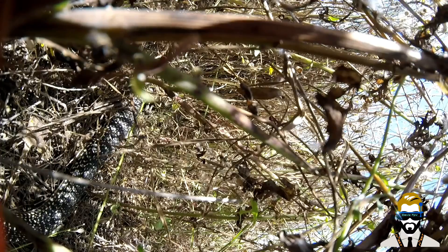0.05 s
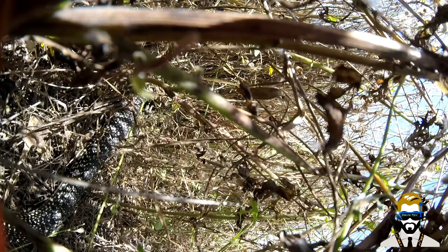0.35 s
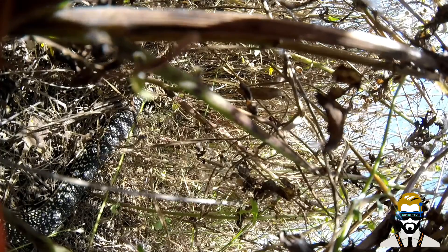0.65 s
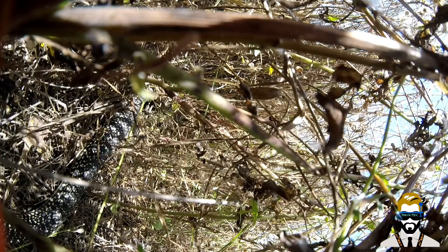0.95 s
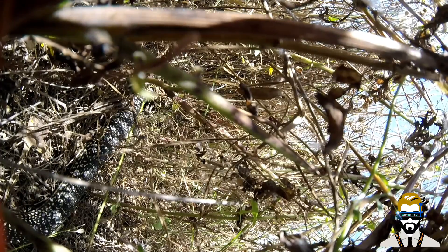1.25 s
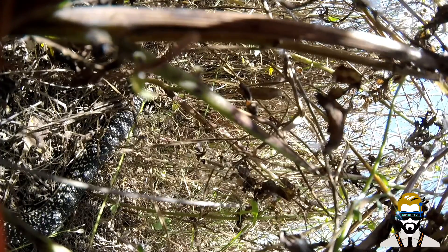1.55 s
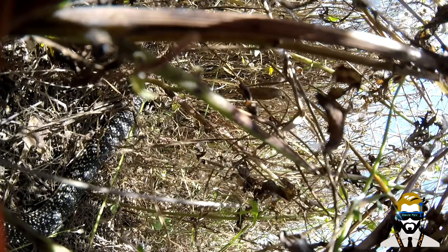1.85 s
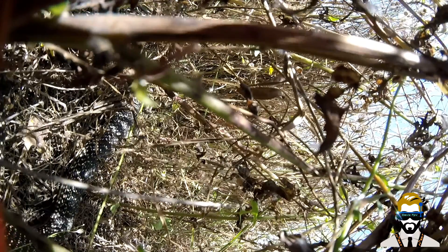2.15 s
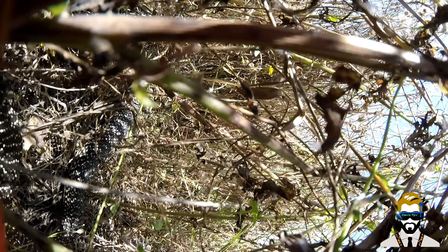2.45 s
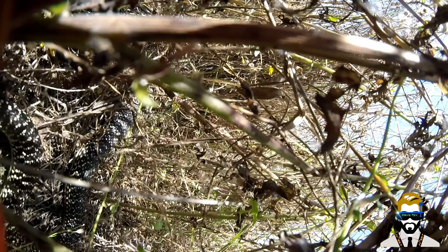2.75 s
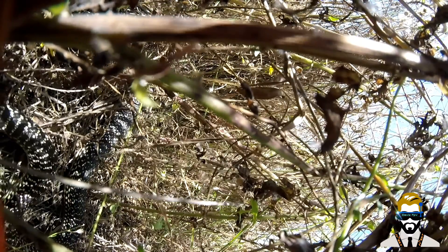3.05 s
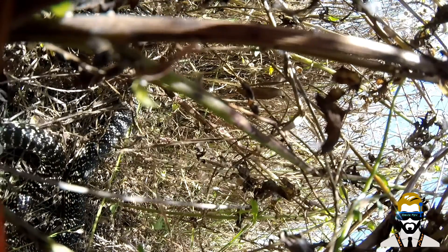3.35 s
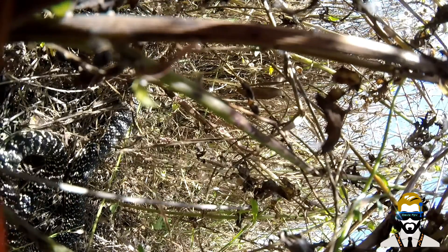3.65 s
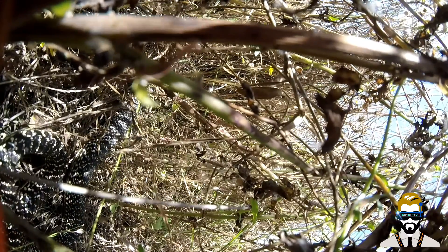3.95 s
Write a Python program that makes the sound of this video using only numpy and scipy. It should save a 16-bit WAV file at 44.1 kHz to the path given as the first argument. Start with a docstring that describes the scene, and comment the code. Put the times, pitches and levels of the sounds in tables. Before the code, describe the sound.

Faint rustling of a snake moving through dry undergrowth outdoors, heard close at ground level. After sparse clicks, stems bump the microphone and a low scraping sets in with brittle crackles and snaps. Steady hiss and rumble lie underneath.

```python
"""An animal, probably a snake, slides through dry grass, its body dragging dully over the ground.
Friction excites a low rustle and the shifting weight a boom. Blades crackle in tiny impulses,
brittle stalks snap by fracture or squeak by stick-slip, and a few stems knock a camera lying
on the ground, exciting its damped modes. Under it all lie a low outdoor rumble and microphone hiss."""
import sys
import numpy as np
from scipy import signal
from scipy.fft import next_fast_len
from scipy.io import wavfile

SR = 44100
rng = np.random.default_rng(int(sys.argv[2]) if len(sys.argv) > 2 else 0)


def to_wav(s):
    """Save 16-bit WAV."""
    ch = np.atleast_2d(s).T  # columns
    pcm = np.round(np.clip(ch, -1, 1) * 32767)  # PCM
    wavfile.write(sys.argv[1], SR, pcm.astype(np.int16))


N = 176400
TIME = np.arange(N) / SR


# Friction of the body on the ground (time [s], level [dB])
DRAG_LEVEL = [(0, -81), (.26, -69), (.295, -51), (.35, -56), (.44, -52.5), (.54, -56.5), (.65, -61),
              (1.4, -65), (2.1, -61.5), (2.2, -45.5), (2.3, -51.5), (2.44, -59), (2.53, -54), (2.57, -51),
              (2.66, -48), (2.86, -53.5), (3.13, -54.5), (3.4, -49.5), (3.52, -54.5), (3.75, -61.5),
              (4, -56)]
# Slips heard through the ground (frequency [Hz], relative spectral density [dB])
DRAG_SPECTRUM = [(30, -11.5), (70, -11), (105, -1.5), (160, -6.5), (210, -6.5), (290, -9), (420, -13),
                 (600, -26), (900, -34.5), (2200, -37.5), (4000, -71.5)]

def drag():
    """Sliding friction: many small slips of the body merge into a noise that the ground dulls."""
    slips = clicks(per_s=900, spread_db=1)
    return level(DRAG_LEVEL) * unit(colour(slips, DRAG_SPECTRUM))


# Boom under the moving body (time [s], level [dB])
BOOM_LEVEL = [(0, -59.5), (2.12, -72), (2.22, -46.5), (2.42, -59.5), (2.52, -50.5), (2.7, -50),
              (2.9, -47.5), (3.1, -54), (3.38, -45.5), (3.55, -58), (4, -61.5)]

def boom():
    """Forced vibration: shifting weight drives a broad, low resonance of ground and camera mount."""
    force = rng.standard_normal(N)
    return level(BOOM_LEVEL) * unit(resonate(force, hz=101.5, width_hz=82))


# Crackling of the blades (time [s], level [dB])
CRACKLE_LEVEL = [(0, -103), (.4, -67.5), (.6, -78), (.88, -71), (2.08, -75.5), (2.19, -58.5), (2.4, -71),
                 (2.55, -63), (2.64, -60), (2.77, -58.5), (2.87, -65.5), (3.05, -63), (3.2, -66.5),
                 (3.34, -59.5), (3.45, -63), (3.66, -67), (3.78, -71), (4, -67)]
# Timbre of dry blades (frequency [Hz], relative spectral density [dB])
CRACKLE_SPECTRUM = [(300, -28), (900, -1.5), (2000, -2.5), (3300, -2.5), (4400, 0.5), (4800, 4.5),
                    (5400, 7), (5950, -5.5), (6500, 8), (7300, -5.5), (9000, -4.5), (11000, -31),
                    (15000, -36)]

def crackle(blades=12, total_per_s=900, decay_s=0.0012):
    """Shot noise: dry blades flick past each other at random, each with its own tiny burst."""
    t = TIME[:512]
    bursts = rng.standard_normal((blades, len(t))) * np.exp(-t / decay_s)
    grains = np.zeros(N)
    for burst in bursts:
        flicks = clicks(total_per_s / blades, spread_db=2.8)
        grains += signal.oaconvolve(flicks, unit(burst))[:N]
    return level(CRACKLE_LEVEL) * unit(colour(grains, CRACKLE_SPECTRUM))


# Breaking stalks, plus a sharp click at 0.862 s as a stem strikes the camera (time [s], ring gain [dB], ring
# frequency [Hz], decay time [s], crack gain [dB])
SNAPS = [(0.5097, -55, 5200, 0.0006, -65), (.862, -57, 5200, .0007, -66), (1.433, -56, 5200, 0.00058, -57),
         (1.7004, -51.5, 5560, 0.0013, -56.5), (2.107, -51.5, 5000, 0.0009, -61),
         (2.1683, -62, 5100, 0.0023, -54), (2.181, -74, 5800, 0.0022, -52.5), (2.274, -57, 4900, .001, -61),
         (2.2895, -55.5, 5500, 0.0026, -56), (2.612, -61, 5240, 0.0022, -58),
         (2.673, -58, 5000, 0.0014, -66), (2.7139, -56, 5400, 0.0011, -52), (2.737, -59, 5130, 0.0018, -57),
         (2.766, -49, 4800, 0.0017, -61), (2.767, -39.5, 5070, .0015, -43.5),
         (2.7728, -51, 5350, .0015, -58), (2.807, -56, 5360, .0015, -56), (3.019, -58, 5200, 0.00087, -63),
         (3.0805, -50.5, 4900, 0.0027, -55), (3.319, -47.5, 5660, 0.001, -72),
         (3.3698, -40.5, 6140, 0.00088, -57), (3.515, -54.5, 4850, .001, -61),
         (3.712, -56, 4600, 0.0014, -52), (3.81, -60, 5300, .001, -60), (3.857, -41.5, 5300, 0.00068, -52),
         (3.9185, -59, 4640, 0.00088, -65)]
# Crack of the fibres (frequency [Hz], relative spectral density [dB])
CRACK_SPECTRUM = [(200, 6), (900, 6), (2000, 8.5), (3500, 7.5), (5500, -0.5), (7000, 9.5), (9000, -1.5),
                  (11000, -16), (15000, -23)]

def snap(ring_db, ring_hz, decay_s, crack_db, scatter_db=-38, scatter_s=0.021):
    """Brittle fracture: a broad crack and the stalk's short ring, scattered faintly by the grass."""
    t = TIME[:2048]
    fade = np.exp(-t / decay_s) + amp(scatter_db) * np.exp(-t / scatter_s)
    ring_burst, crack_burst = rng.standard_normal((2, len(t))) * fade
    ring = unit(resonate(ring_burst, ring_hz, width_hz=1500))
    crack = unit(colour(crack_burst, CRACK_SPECTRUM))
    return 2 * rms(fade) * (amp(ring_db) * ring + amp(crack_db) * crack)


# Rubbing blades (time [s], duration [s], start frequency [Hz], end frequency [Hz], level [dB])
SQUEAKS = [(3.568, 0.024, 5200, 5600, -63), (3.648, 0.026, 4250, 4600, -63.5)]

def squeak(length_s, start_hz, end_hz, db):
    """Stick-slip friction: a rubbing blade gives a brief rising chirp of narrow-band noise."""
    progress = np.linspace(0, 1, round(length_s * SR))
    glide_hz = start_hz + (end_hz - start_hz) * progress
    tone = resonate(rng.standard_normal(len(progress)), glide_hz, width_hz=530)
    return amp(db) * unit(tone * np.sin(np.pi * progress))


# Stems striking the camera
# (time [s], thud gain [dB], contact time [s], stem frequency [Hz], stem level [dB], tick gain [dB])
KNOCKS = [(.293, -48, .002, 300, -44.5, -75), (0.8612, -30.5, 0.00085, 232, -32, -48),
          (0.8671, -36, 0.00068, 401, -41, -54), (2.1688, -48, 0.00057, 422, -36, -43.5),
          (2.1866, -37, 0.0013, 352, -33.5, -48), (2.201, -34, 0.0019, 127, -28, -68),
          (2.2933, -47, 0.0012, 360, -39.5, -60)]
# Modes of the camera (frequency [Hz], relative level [dB], time to fall 60 dB [s])
CAMERA_MODES = [(121, -18.5, 0.15), (166.3, -5, 0.14), (226, -0.5, 0.057), (343, -22.5, 0.11),
                (506, -7.5, 0.026), (865, -18, 0.035)]
# Woody tick of contact (frequency [Hz], relative spectral density [dB])
TICK_SPECTRUM = [(300, -26), (900, -7), (1400, 1), (1950, 7), (2800, -13), (4000, -20), (9000, -37)]

def knock(thud_db, contact_s, stem_hz, stem_db, tick_db, stem_t60_s=0.043, tick_decay_s=0.0013):
    """Impact excitation: a tick, then camera and stem ring freely; longer contact dulls the thud."""
    t = TIME[:8192]
    modes = sum(amp(db - 60 * t / t60) * np.cos(2 * np.pi * hz * t) for hz, db, t60 in CAMERA_MODES)
    force = t * np.exp(-2 * t / contact_s)
    thud = signal.fftconvolve(modes, force / force.sum())[:len(t)]
    stem = amp(-60 * t / stem_t60_s) * np.sin(2 * np.pi * stem_hz * t)
    fade = np.exp(-t / tick_decay_s)
    burst = rng.standard_normal(len(t)) * fade
    tick = rms(fade) * unit(colour(burst, TICK_SPECTRUM))
    return amp(thud_db) * thud + amp(stem_db) * stem + amp(tick_db) * tick


# Outdoor rumble (frequency [Hz], relative spectral density [dB])
RUMBLE_SPECTRUM = [(12, -5), (25, -2.5), (36, 4), (52, -8), (76, 0.5), (100, -2.5), (120, -16.5),
                   (170, -16), (300, -21), (500, -25.5), (900, -36), (2000, -59)]
# Microphone self-noise (frequency [Hz], relative spectral density [dB])
HISS_SPECTRUM = [(100, -4.5), (800, 1), (1200, -1.5), (1900, -2), (2600, -4.5), (3900, -11), (4600, -12.5),
                 (5400, -8), (5900, -11), (6200, -5.5), (6480, 4), (7100, -3.5), (7600, -4), (8500, -5),
                 (9400, -9), (10400, -15), (12100, -12), (13500, -21.5), (14600, -34)]

def background(rumble_db=-50, hiss_db=-60.5):
    """Stationary noise: a low outdoor rumble and the even hiss of the microphone."""
    low, high = rng.standard_normal((2, N))
    rumble = amp(rumble_db) * unit(colour(low, RUMBLE_SPECTRUM))
    hiss = amp(hiss_db) * unit(colour(high, HISS_SPECTRUM))
    return rumble + hiss


def amp(db):
    """Amplitude ratio from decibels."""
    return 10 ** (np.asarray(db) / 20)


def rms(x):
    """Root-mean-square amplitude."""
    return np.sqrt(np.mean(x ** 2) + 1e-20)


def unit(x):
    """Normalisation to rms 1."""
    return x / rms(x)


def level(points):
    """Amplitude envelope through points of (time [s], level [dB])."""
    return amp(np.interp(TIME, *np.transpose(points)))


def colour(x, points):
    """Minimum-phase filter through points of (frequency [Hz], gain [dB])."""
    size = 2 * next_fast_len(len(x))
    point_hz, db = np.transpose(points)
    hz = abs(np.fft.fftfreq(size, 1 / SR))
    log_gain = np.log(amp(np.interp(np.log(hz + 1), np.log(point_hz + 1), db)))
    response = np.exp(np.conj(signal.hilbert(log_gain)))
    return np.fft.ifft(np.fft.fft(x, size) * response).real[:len(x)]


def resonate(x, hz, width_hz):
    """Double-pole resonance at a fixed or moving frequency."""
    carrier = np.exp(2j * np.pi * np.cumsum(hz * np.ones(len(x))) / SR)
    pole = np.exp(-np.pi * width_hz / SR)
    baseband = signal.lfilter([(1 - pole) ** 2], [1, -2 * pole, pole * pole], x / carrier)
    return (carrier * baseband).real


def clicks(per_s, spread_db):
    """Poisson process: random impulses, most small and a few large."""
    size = amp(spread_db * np.minimum(rng.exponential(1, N), 4))
    return size * rng.choice([-1, 1], N) * (rng.random(N) < per_s / SR)


def scene():
    """Superposition: all sources add at one microphone."""
    mix = background() + drag() + boom() + crackle()
    for source, table in (snap, SNAPS), (squeak, SQUEAKS), (knock, KNOCKS):
        for start_s, *settings in table:
            sound = source(*settings)
            span = mix[round(start_s * SR):][:len(sound)]
            span += sound[:len(span)]
    return mix[None]


def record(dry, cutoff_hz=14500):
    """Band limiting: a steep low-pass filter removes the highest treble."""
    lowpass = signal.firwin(511, cutoff_hz, window=("kaiser", 9), fs=SR)
    return signal.oaconvolve(dry, lowpass[None], "same")


dry = scene()
out = record(dry)
to_wav(out)
```